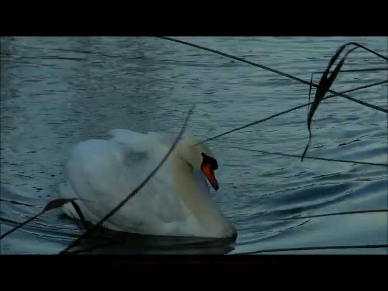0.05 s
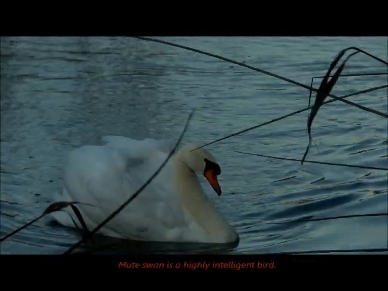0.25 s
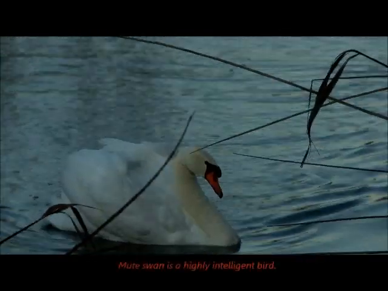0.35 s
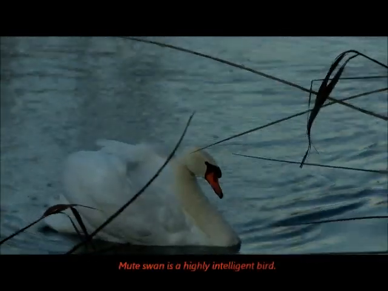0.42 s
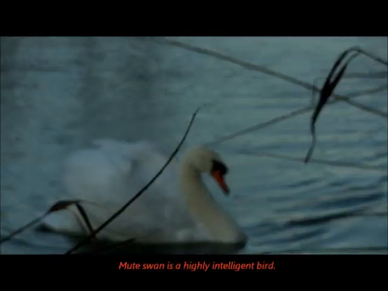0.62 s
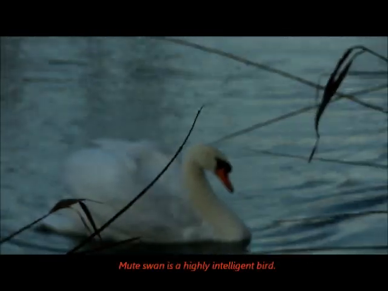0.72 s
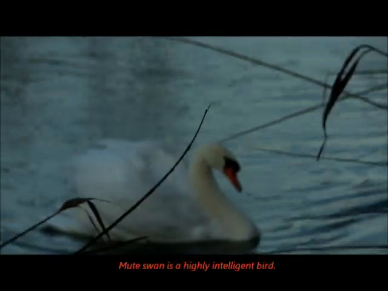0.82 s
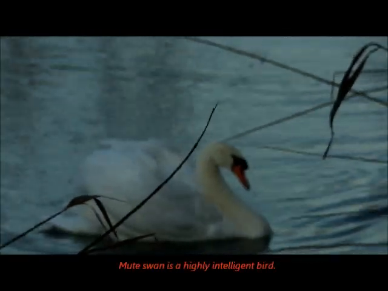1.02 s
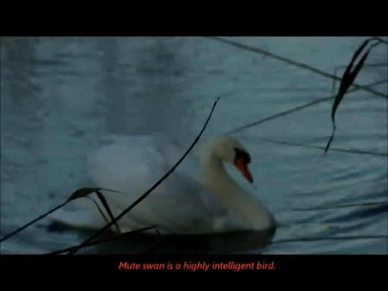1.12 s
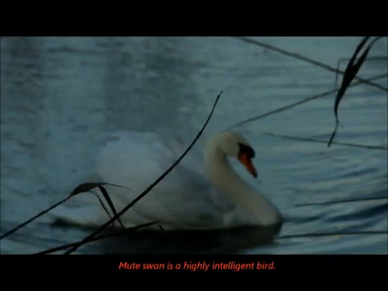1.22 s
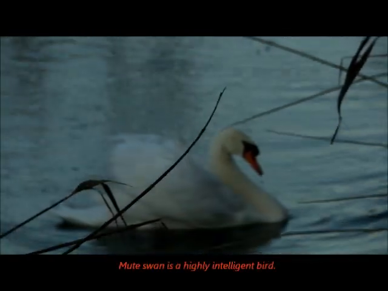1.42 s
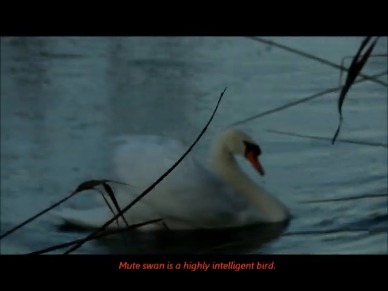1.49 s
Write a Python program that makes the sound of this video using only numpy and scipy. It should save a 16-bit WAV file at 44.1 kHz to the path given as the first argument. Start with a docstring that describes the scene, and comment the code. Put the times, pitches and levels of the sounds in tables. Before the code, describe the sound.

A single brief swan grunt on open water, starting as a quiet rising squeak and turning into a harsh fluttering rattle with a breathy end; nearby, fairly dry stereo pickup, with only a faint distant rush and hiss behind.

```python
"""Over a distant low rush and a thin, wide hiss, a swan on open water gives one grunting call.
A low creak, pulses from a tightening membrane, speeds up into a rising squeal that breaks up at the top.
It gives way to a rattle: each beat is a pop and a short whistle whose pitch arches and falls as the airway shuts.
A faint hiss of air outlasts the last beat; water and bank scatter a faint, quickly dying tail behind it all."""
import sys
import numpy as np
from scipy import signal
from scipy.fft import rfft, irfft
from scipy.io import wavfile
from scipy.ndimage import uniform_filter1d

SR = 44100
rng = np.random.default_rng(int(sys.argv[2]) if len(sys.argv) > 2 else 0)


def digitize_waveform(pressure):
    """Quantize a signal to 16-bit integers and store it at the path in sys.argv[1].

    Rows of a 2-D input are taken as channels; values are limited to [-1, 1].
    """
    field = np.atleast_2d(pressure).T
    bounded = np.clip(field, -1, 1)
    quanta = np.round(bounded * 32767).astype(np.int16)
    wavfile.write(sys.argv[1], SR, quanta)


N = 68355  # samples, about 1.55 s

# Path of the squeal: time_s, pitch_hz, fundamental_db, overtones_db, roughness (0 clean, about 1 broken)
SQUEAL_PATH = [(.04, 198.5, -95, -93, 0.1), (0.065, 216.1, -79, -68.5, 0.37),
               (.095, 238.4, -90, -69.5, 0.37), (0.124, 264.6, -93, -73.5, 0.5),
               (.143, 299, -83, -67.5, 0.65), (0.162, 437, -85, -73, 0.54), (.175, 537.4, -76, -66, 0.25),
               (0.199, 586, -62.5, -63.5, 0.17), (0.257, 744.7, -49, -57.5, 0.2),
               (0.28, 886, -52.5, -58, 0.2), (0.302, 922, -49.5, -52.5, 0.3), (0.312, 974, -52, -52, 0.1),
               (0.323, 872, -59, -58.5, 1.11), (0.333, 722, -56, -72, 0.56), (0.34, 723, -95, -89, 0.6)]
# Throat resonances on the squeal's overtones and air: frequency_hz, gain_db
THROAT_COLOUR = [(400, -17), (800, -2.5), (1150, -2.5), (1450, 1), (1800, 1.5), (2200, 1), (2450, -5),
                 (2850, -5), (3300, -15.5), (3800, -9), (4200, -18), (4750, -7), (5300, -10), (5900, -31),
                 (8000, -45)]
# Beats of the rattle, before the bill colours them: start_s, pop_db, pop_hz, whistle_db, top_pitch_hz,
# arch_depth (0-1), swell_db (climb of the whistle while open), open_s
RATTLE_BEATS = [(0.3385, -59, 1550, -32, 1508, 0, -5.5, 0.0055),
                (.3573, -26, 1546, -31.5, 2003, 0.89, 9.5, 0.0072),
                (0.377, -25.5, 1650, -30.5, 2262, 1, 14.5, 0.007),
                (0.3967, -25.5, 1634, -35, 2361, 1, 0, 0.00727),
                (0.4149, -25.5, 1900, -39, 2455, 0.93, -3, 0.0088),
                (0.4349, -23, 2010, -35, 2491, 0.94, 9, 0.00883),
                (0.4546, -26, 1746, -34.5, 2360, 0.99, 17, 0.0079),
                (0.4743, -25, 1677, -34, 2430, 0.94, 16, .0082),
                (.4946, -26, 1663, -33.5, 2310, 0.75, 11, 0.00734),
                (.5148, -28, 1540, -33.5, 2214, 1, 15, 0.00737),
                (0.5357, -30.5, 1495, -38.5, 2108, 0.95, 1, 0.00805),
                (.5570, -36.5, 1400, -39, 1519, 0.68, -1.5, 0.0062),
                (0.5811, -75, 1100, -40.5, 1105, 0.46, -3, 0.0067)]
# Harmonics of the pop and of the whistle, fundamental first: gain_db
POP_HARMONICS = [-4.5, -16.5, -20.5]
WHISTLE_HARMONICS = [-4, -13, -22, -35]
# Rushing air inside each beat: frequency_hz, gain_db
RASP_COLOUR = [(300, -19.5), (1200, 5), (2300, -5.5), (3200, 3.5), (4500, 0), (5400, -2), (7000, -10)]
# Bill resonances on the whole rattle: frequency_hz, gain_db
BILL_COLOUR = [(60, -22), (150, -12.5), (350, -4.5), (700, 0), (1500, 2.5), (2300, 3.5), (2700, -2.5),
               (3200, -5), (4000, -8.5), (4700, 0.5), (5300, -7.5), (6000, -16), (8000, -40)]
# Air that hisses on as the rattle ends: frequency_hz, gain_db
AFTER_AIR_COLOUR = [(300, -16), (1000, -5), (1900, -10), (2600, 10), (3400, -14), (6000, -34)]
# Balance of the bird, positive to the left: frequency_hz, left_over_right_db
BIRD_BALANCE = [(400, 1), (700, 1), (1290, -4), (1700, -5), (2300, 1.5), (4400, -1.7)]
# Tone of the scattered tail: frequency_hz, gain_db
TAIL_COLOUR = [(300, -2), (1400, -1), (2100, -10), (2800, -9), (5000, -2)]
# Spectra of the distant rush and the thin hiss, relative: frequency_hz, density_db (per Hz)
RUSH_COLOUR = [(20, -25), (40, -21), (75, -22), (120, -22), (170, -15), (230, -10), (310, -2.5), (410, 0.5),
               (540, -4), (680, -12), (1000, -14.5), (1400, -20.5), (2000, -41.5), (4000, -44.5)]
HISS_COLOUR = [(30, -5.5), (120, -18), (400, 3.5), (900, 10), (1500, 6), (2500, -1), (4000, 0), (6000, 1.5),
               (8000, -4), (11000, -8), (15500, -11)]

# Squeal: pitch jitter (share of pitch) and level flutter, both at full roughness
SQUEAL_JITTER, SQUEAL_FLUTTER_DB, SQUEAL_AIR_DB = 0.066, 0.5, -5
# Overtones fade above this pitch plus this multiple of the fundamental
CREAK_EDGE_HZ, SQUEAL_REACH = 550, 4.7

# Each beat: the pop, and the click as the airway snaps open (level for the hardest pop)
POP_RISE_S, POP_DECAY_S = 0.00073, 0.0014
CLICK_DB, CLICK_AT_S, CLICK_WIDTH_S = -33, 0.0008, 0.00014
# Each beat: the whistle, whose pitch peaks at a share of the open time; jitter is a share of pitch
WHISTLE_RISE_S, WHISTLE_RELEASE_S = 0.0012, 0.0029
WHISTLE_FLUTTER_DB, WHISTLE_JITTER = 1.1, 0.013
ARCH_TOP_SHARE, ARCH_RISE_S, ARCH_FALL_S = 0.762, 0.0087, 0.00515
RASP_DB = -10.5  # against the airflow
WINDPIPE_ECHO_S, WINDPIPE_ECHO_DB = 0.0039, -16.5  # round trip along the long neck

AFTER_AIR_DB = -68.5  # rms before the swell shapes it
AFTER_AIR_AT_S, AFTER_AIR_WIDTH_S = 0.6, 0.023
BIRD_RIGHT_LAG_S = 0.000055
TAIL_DB, TAIL_T60_S, TAIL_START_S = -16.5, 0.38, 0.001
RUSH_DB, HISS_DB = -59, -72.5  # rms, the rush before panning
RUSH_PAN_DB, RUSH_LEFT_LAG_S = 2.5, 0.00031
TOP_HZ = 15650


def undb(db):
    """Decibels to gain."""
    return 10 ** (np.asarray(db) / 20)


def level(x, db):
    """Scale to an rms level in dB."""
    return x * undb(db) / np.sqrt(np.mean(x ** 2))


def walk(rate):
    """Smooth random wander with a spread near 1, drawn anew at this rate in Hz."""
    step = max(int(SR / rate), 1)
    held = np.repeat(rng.standard_normal(N), step)[:N]
    return 1.3 * uniform_filter1d(uniform_filter1d(held, step), step)


def gain_at(hz, points):
    """Read gain from (Hz, dB) points on a log-frequency axis."""
    point_hz, point_db = np.array(points, float).T
    return undb(np.interp(np.log(hz + 1e-3), np.log(point_hz), point_db))


def colour(x, points):
    """Filter by (Hz, dB) points."""
    return irfft(rfft(x) * gain_at(np.fft.rfftfreq(N, 1 / SR), points), N)


def coloured_noise(points):
    """White noise filtered by (Hz, dB) points."""
    return colour(rng.standard_normal(N), points)


def late(x, seconds):
    """Delay by a short time, finer than a sample."""
    turn = np.exp(-2j * np.pi * np.fft.rfftfreq(N, 1 / SR) * seconds)
    return irfft(rfft(x) * turn, N)


def pan(x, db):
    """Left and right, the left louder by db."""
    return x * undb(np.array([[db], [-db]]) / 2)


def tone(hz, partials_db):
    """A harmonic tone on a moving pitch."""
    phase = 2 * np.pi * np.cumsum(hz) / SR
    return sum(undb(db) * np.sin((k + 1) * phase) for k, db in enumerate(partials_db))


def squeal():
    """A tightening membrane: soft creaking pulses speed up into a clean rising tone that breaks up at the top."""
    t = np.arange(N) / SR
    times, *columns = np.array(SQUEAL_PATH).T
    pitch, low_db, high_db, rough = (np.interp(t, times, column) for column in columns)
    hz = pitch * (1 + SQUEAL_JITTER * rough * walk(900))
    phase = 2 * np.pi * np.cumsum(hz) / SR
    edge = CREAK_EDGE_HZ + SQUEAL_REACH * pitch
    overtones = np.zeros(N)
    for k in range(2, 14):
        fade = np.hypot(1, (k * pitch / edge) ** 5)
        overtones += gain_at(k * pitch, THROAT_COLOUR) / fade * np.cos(k * phase)
    # Air puffs once per pulse, where the voice is rough
    air = rough * (1 + np.cos(phase)) * level(coloured_noise(THROAT_COLOUR), SQUEAL_AIR_DB)
    voice = undb(low_db) * np.sin(phase) + undb(high_db) * (overtones + air)
    flutter = undb(SQUEAL_FLUTTER_DB * rough * walk(400))
    sounding = (t > times[0]) * (t < times[-1])
    return np.sqrt(2) * voice * flutter * sounding


def pop_envelope(t):
    """Pressure bursts through as the airway opens, then dies away."""
    rise = np.sin(np.pi / 2 * np.minimum(t / POP_RISE_S, 1)) ** 2
    return rise * np.exp(-np.maximum(t - POP_RISE_S, 0) / POP_DECAY_S)


def whistle_flow(t, whistle_db, swell_db, open_s):
    """Airflow swells while the airway is open and drops as it shuts."""
    swell = -swell_db * np.maximum(1 - t / open_s, 0)
    flow = undb(whistle_db + swell + WHISTLE_FLUTTER_DB * walk(1000)[:len(t)])
    release = np.exp(-(np.maximum(t - open_s, 0) / WHISTLE_RELEASE_S) ** 2)
    return flow * np.minimum(t / WHISTLE_RISE_S, 1) * release


def whistle_pitch(t, top_hz, arch, open_s):
    """Pitch in Hz climbs to a top within the open time, then falls faster as the airway shuts."""
    top_s = ARCH_TOP_SHARE * open_s
    off_top = (t - top_s) / np.where(t < top_s, ARCH_RISE_S, ARCH_FALL_S)
    jitter = 1 + WHISTLE_JITTER * walk(1190)[:len(t)]
    return top_hz * (1 + off_top ** 2) ** -arch * jitter


def rattle():
    """The airway pops open, whistles and shuts some fifty times a second; the windpipe echoes each beat."""
    beats, airflow = np.zeros(N), np.zeros(N)
    t = np.arange(SR // 40) / SR
    click = undb(CLICK_DB) * np.exp(-((t - CLICK_AT_S) / CLICK_WIDTH_S) ** 2)
    pop_shape = pop_envelope(t)
    hardest_db = max(beat[1] for beat in RATTLE_BEATS)
    for start, pop_db, pop_hz, whistle_db, top_hz, arch, swell_db, open_s in RATTLE_BEATS:
        pop = undb(pop_db) * pop_shape
        flow = whistle_flow(t, whistle_db, swell_db, open_s)
        first = int(start * SR)
        span = slice(first, first + len(t))
        beats[span] += flow * tone(whistle_pitch(t, top_hz, arch, open_s), WHISTLE_HARMONICS)
        beats[span] += pop * tone(np.full(len(t), pop_hz), POP_HARMONICS)
        beats[span] += undb(pop_db - hardest_db) * click
        airflow[span] += pop + flow
    rasp = undb(RASP_DB) * airflow * coloured_noise(RASP_COLOUR)
    echo = undb(WINDPIPE_ECHO_DB) * late(beats, WINDPIPE_ECHO_S)
    return colour(beats + echo + rasp, BILL_COLOUR)


def after_air():
    """A faint hiss of turbulent air from the bill outlasts the last beat."""
    t = np.arange(N) / SR
    swell = np.exp(-((t - AFTER_AIR_AT_S) / AFTER_AIR_WIDTH_S) ** 2)
    return level(coloured_noise(AFTER_AIR_COLOUR), AFTER_AIR_DB) * swell


def place_bird(call):
    """The call leans left or right by frequency and reaches the right side slightly later."""
    left = colour(call, [(hz, db / 2) for hz, db in BIRD_BALANCE])
    right = colour(call, [(hz, -db / 2) for hz, db in BIRD_BALANCE])
    return np.array([left, late(right, BIRD_RIGHT_LAG_S)])


def bank(call):
    """Water and reeds scatter the call into a faint tail: decaying noise, separate for each side."""
    t = np.arange(SR // 3) / SR
    decay = np.exp(-np.log(1000) * t / TAIL_T60_S) * (t > TAIL_START_S)
    tail = rng.standard_normal((2, len(t))) * decay
    tail = tail / np.sqrt(np.sum(tail ** 2, axis=1, keepdims=True))  # unit energy
    return undb(TAIL_DB) * signal.fftconvolve(colour(call, TAIL_COLOUR)[None], tail, axes=1)[:, :N]


def rush():
    """Distant wind or water: steady low noise, louder on the left but later there."""
    left, right = pan(level(coloured_noise(RUSH_COLOUR), RUSH_DB), RUSH_PAN_DB)
    return np.array([late(left, RUSH_LEFT_LAG_S), right])


def hiss():
    """Even, thin hiss, wide because each side has its own noise."""
    return np.array([level(coloured_noise(HISS_COLOUR), HISS_DB) for _ in range(2)])


def scene():
    """The swan's call and its tail over the rush and hiss."""
    call = squeal() + rattle() + after_air()
    return place_bird(call) + bank(call) + rush() + hiss()


def record(dry):
    """A steep low-pass cuts the extreme treble."""
    top_cut = signal.ellip(10, 0.1, 70, TOP_HZ, fs=SR, output="sos")
    return signal.sosfilt(top_cut, dry)


dry = scene()
out = record(dry)
digitize_waveform(out)
```